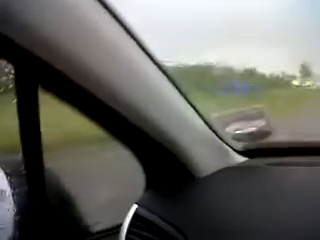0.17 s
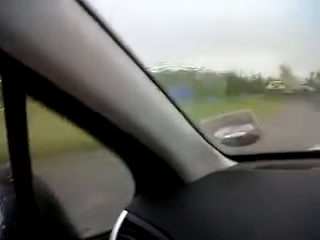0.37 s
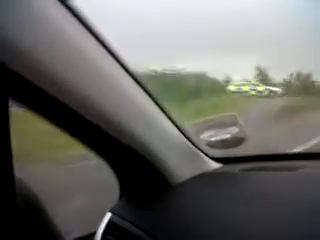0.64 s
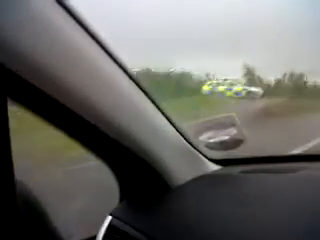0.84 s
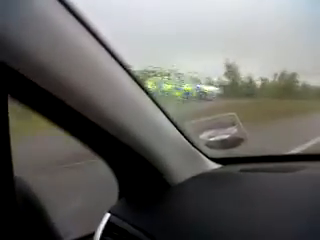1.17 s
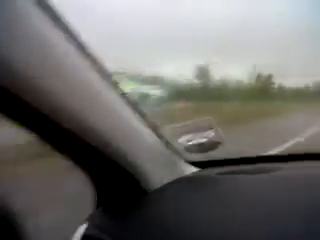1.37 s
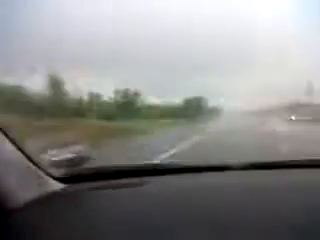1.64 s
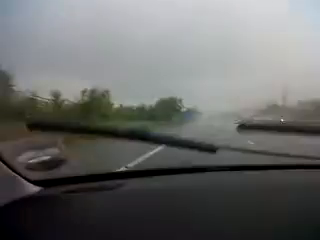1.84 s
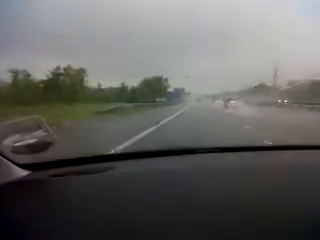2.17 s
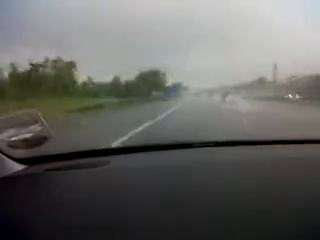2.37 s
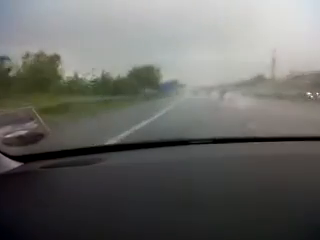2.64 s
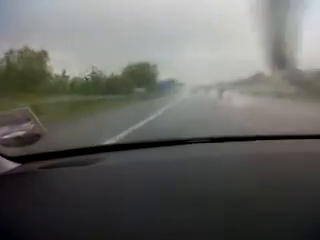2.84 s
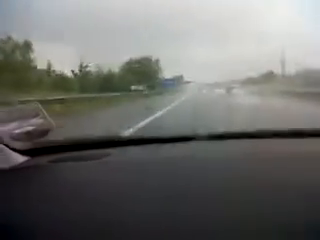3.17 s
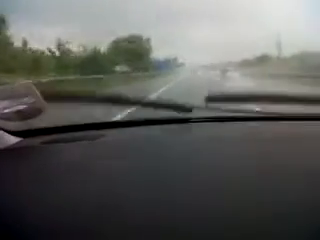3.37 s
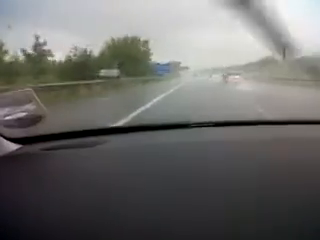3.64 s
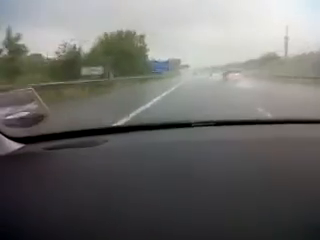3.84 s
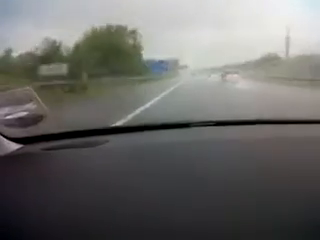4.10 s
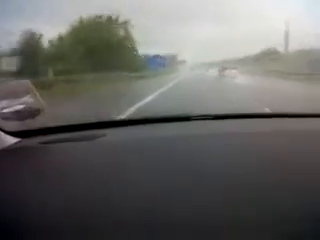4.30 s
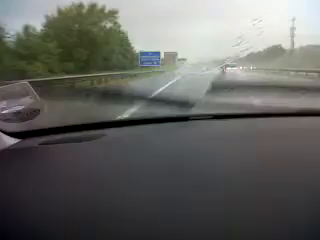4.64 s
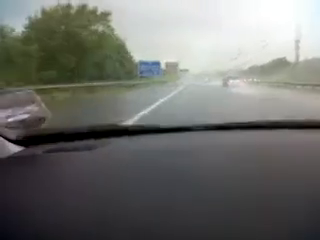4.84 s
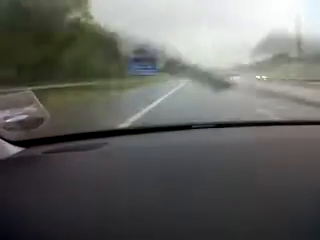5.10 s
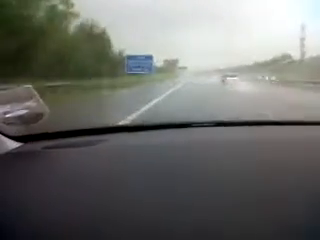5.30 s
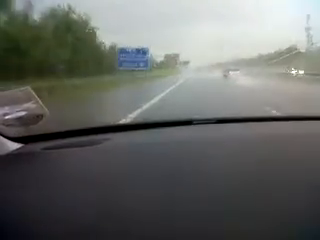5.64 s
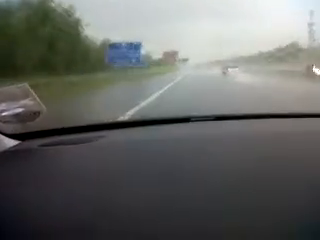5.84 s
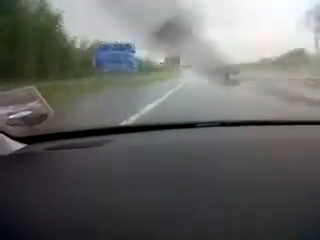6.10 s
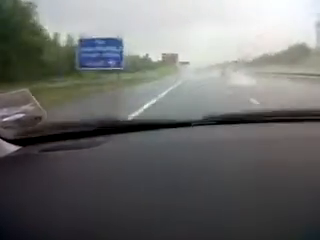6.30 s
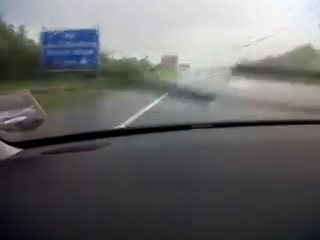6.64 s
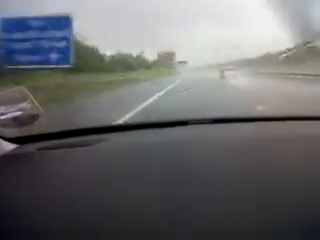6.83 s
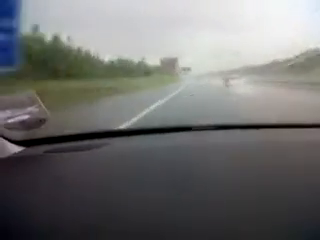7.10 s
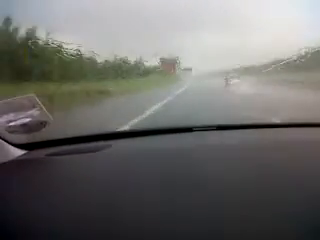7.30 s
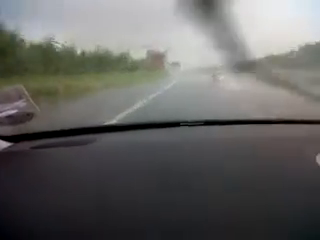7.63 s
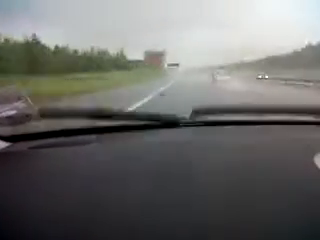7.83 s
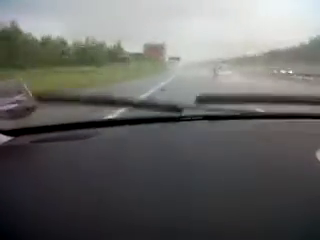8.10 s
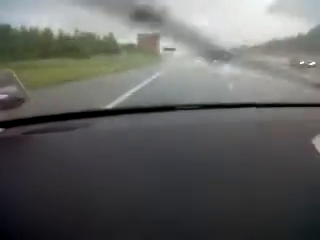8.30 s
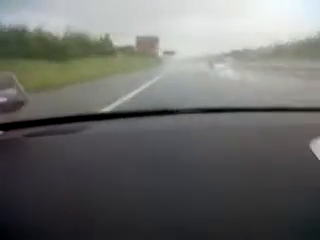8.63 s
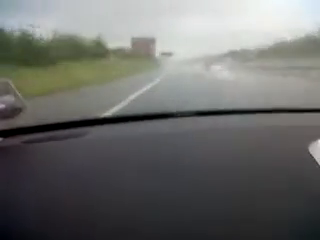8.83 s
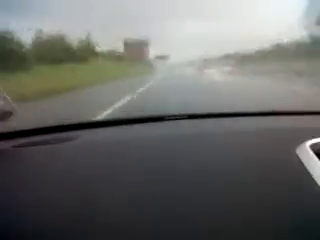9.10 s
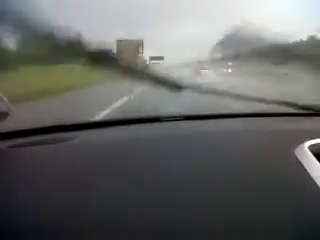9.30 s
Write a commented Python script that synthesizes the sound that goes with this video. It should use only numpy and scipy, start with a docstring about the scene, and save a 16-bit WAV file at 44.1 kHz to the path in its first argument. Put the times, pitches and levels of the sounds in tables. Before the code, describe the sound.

Heavy rain drums on a car's roof and patters brightly on the windscreen, heard from inside on a wet motorway. Tyres roar and wash through standing water over a low cabin boom and faint engine hum. A side window hums at first, then fades. The rain gradually thickens, with occasional fat drops tapping the glass, soft wiper thuds and dull knocks from road seams. One dry tick comes near the end.

```python
"""Heavy rain drums on a car's roof and patters on its windscreen, heard from inside on a wet motorway.
Thousands of impacts a second excite the panels, in clumps, a few drops large; the rain thickens as the
car slowly gathers speed. Beneath it the tyres roar and wash through standing water, the cabin air booms
at bumps, road seams knock, the wipers thud and the engine hums. A side window resonates in the airstream
until the microphone turns away, about a second in. One dry tick sounds near the end."""
import sys
import numpy as np
from scipy import signal
from scipy.fft import rfft, irfft
from scipy.io import wavfile
from scipy.ndimage import uniform_filter1d

SR = 44100
rng = np.random.default_rng(int(sys.argv[2]) if len(sys.argv) > 2 else 0)


def generate_wav(signal):
    """Clip the signal to [-1, 1] and save it as 16-bit WAV at the path in sys.argv[1]."""
    frames = np.transpose(np.atleast_2d(signal))
    scaled = np.clip(frames, -1, 1) * 32767
    pcm = np.round(scaled).astype(np.int16)
    wavfile.write(sys.argv[1], SR, pcm)


N = 417627
T = np.arange(N) / SR

# strength of the rain on roof and glass: time_s, relative_level_db
RAIN_STRENGTH = [(0.0, -43), (0.85, -42.0), (1.6, -44.5), (1.85, -42.3), (2.05, -44), (2.65, -41),
                 (2.9, -43), (3.45, -41.5), (3.65, -42), (4.68, -40.5), (4.8, -40.5), (4.95, -40.5),
                 (5.1, -40.2), (5.25, -42), (5.35, -41.5), (5.52, -41.5), (5.64, -41), (6.05, -39.5),
                 (6.3, -41.5), (6.55, -40), (7.42, -38.5), (7.6, -40), (8.1, -38.5), (8.3, -41.5),
                 (8.5, -37.5), (8.8, -38.5), (9.46, -39.5)]
# spectrum of a drop heard through the lined roof: frequency_hz, relative_level_db
ROOF_SPECTRUM = [(150, -19.5), (400, -5.5), (560, -4.5), (700, 3), (900, 1.5), (1040, -2.5), (1150, 4),
                 (1290, -2), (1460, 0.5), (1750, -8.5), (2050, -11), (2500, -20), (4000, -31),
                 (7000, -61.5)]
# spectrum of a drop heard through the glass: frequency_hz, relative_level_db
GLASS_SPECTRUM = [(300, -14.5), (900, 5.5), (1600, 6), (2100, -4.5), (2480, -7.5), (2750, -0.9),
                  (2980, -1.5), (3180, -3), (3450, -8), (3600, -6), (3850, -7), (4400, -11.5), (4700, -13),
                  (5500, -23), (6500, -33.5), (7000, -35.5), (8000, -53.5)]
# reverberation time of the panels and cabin: frequency_hz, t60_s
CABIN_DECAY = [(200, 0.11), (1000, 0.058), (3000, 0.038), (7000, 0.025)]
# normal modes of the windscreen: pitch_hz, relative_level_db, t60_s
WINDSCREEN_MODES = [(2900, -1, 0.019), (3002, -1, 0.03), (3130, 1, 0.026), (3230, -3, 0.026)]
# tyre roar, following the roughness of the road: time_s, level_db
ROAR_LEVEL = [(0, -36), (1.0, -37), (1.4, -36.5), (3.6, -36.5), (4.7, -35.5), (5.4, -36), (7.3, -35),
              (8.4, -34.5), (9.47, -35)]
# spectrum of road noise in the cabin: frequency_hz, relative_level_db
ROAR_SPECTRUM = [(15, -26), (26, -14), (34, -4), (47, -8), (68, -5), (78, 1.5), (88, -0.5), (110, -5.5),
                 (128, -1), (141, -5.5), (165, -5.5), (220, -6.5), (310, -7.5), (455, -8), (550, -14.5),
                 (1500, -23.5), (3000, -50.5), (7000, -79)]
# resonances of the tread on wet asphalt: pitch_hz, width_hz, relative_level_db
TREAD_RESONANCES = [(775, 85, -1.5), (905, 72, -1)]
# resonances of the side window: pitch_hz, width_hz, relative_level_db
WINDOW_RESONANCES = [(483, 68, 2), (1055, 55, -4.5)]
# bumps in the road that set the cabin air booming: centre_s, relative_level_db
ROAD_BUMPS = [(0.22, -39), (0.53, -34), (1.13, -32.5), (1.37, -37), (1.49, -32), (2.01, -33), (2.18, -32),
              (3.29, -31.5), (3.45, -32.5), (3.56, -31.5), (3.66, -36), (3.97, -31), (4.22, -32.5),
              (4.45, -36), (4.86, -40), (5.07, -31.5), (5.44, -34), (5.68, -31.5), (6.0, -37),
              (6.23, -36.5), (6.82, -34), (7.11, -33), (7.23, -34), (7.44, -37), (7.67, -37), (8.4, -30),
              (8.78, -29), (9.09, -33.5), (9.24, -34), (9.44, -38)]
# drone of the floor panel: time_s, relative_level_db
FLOOR_DRONE = [(0, -43.5), (1.6, -49), (1.83, -52), (2.05, -41), (2.9, -41), (3.05, -51), (3.25, -45),
               (3.6, -45.5), (4.4, -46), (5.2, -46), (5.9, -45), (6.7, -43.5), (8.6, -43), (8.8, -54),
               (9.05, -45), (9.47, -40)]
# course of the engine's hum: time_s, firing_rate_hz, level_db
ENGINE_HUM = [(0, 72.9, -54), (1, 73.64, -46.5), (2.3, 75.1, -49), (3.5, 74.36, -58), (5, 78.04, -44),
              (6.3, 77, -46.5), (8, 77.9, -48.5), (9.47, 78.4, -42.5)]
# large drops on the windscreen: start_s, relative_peak_db
LARGE_DROPS = [(0.3117, -40), (0.348, -38), (0.892, -31), (2.449, -36), (3.1134, -29), (4.585, -31),
               (5.326, -30), (5.6158, -29.5), (5.7783, -41), (6.27, -32), (6.4263, -30), (7.221, -30.5),
               (7.426, -28.5), (7.9554, -33)]
# standing water under the tyres: centre_s, level_db, pitch_hz
STANDING_WATER = [(0.48, -47, 840), (0.8, -41.5, 900), (1.08, -43.5, 470), (1.46, -45, 835),
                  (2.38, -50.5, 1249), (2.74, -44.5, 855), (3.47, -46.5, 1050), (4.35, -45.5, 1334),
                  (4.72, -49, 1200), (4.92, -50, 1400), (6.9, -48.5, 1310), (7.2, -45, 800),
                  (7.45, -45, 779), (7.84, -45, 997), (8.061, -49.5, 1500), (8.46, -40, 900),
                  (8.62, -48, 880), (8.77, -46, 1500)]
# seams in the road: start_s, peak_db
ROAD_SEAMS = [(2.52, -36.5), (6.73, -32), (7.27, -34.5), (7.83, -31.5), (8.55, -36), (9.0, -31.5),
              (9.11, -31)]
# wiper blades flipping at the foot of the windscreen: start_s, peak_db
BLADE_FLIPS = [(3.445, -31.5), (5.045, -33), (6.515, -33), (8.175, -29)]
# a tyre singing through a long streak of water: time_s, pitch_hz, level_db
SWISH_GLIDE = [(6.78, 981, -62), (6.9, 905, -34.5), (6.99, 865, -48.5), (7.05, 800, -39), (7.15, 783, -57)]


def from_db(db):
    """Amplitude grows tenfold for every 20 dB."""
    return 10 ** (np.asarray(db) / 20)


def unit(x):
    """Normalisation to an rms of 1."""
    return x / np.sqrt(np.mean(x ** 2) + 1e-20)


def follow(curve, column=1):
    """Linear interpolation of one column of a curve at every sample."""
    rows = np.array(curve)
    return np.interp(T, rows[:, 0], rows[:, column])


def at_hz(points, hz):
    """Interpolation on a logarithmic frequency axis."""
    frequency_hz, value = np.transpose(points)
    return np.interp(np.log(hz + 1), np.log(frequency_hz), value)


def drift(rate_hz):
    """Low-pass filtered noise: a smooth random fluctuation of rms 1."""
    hz = np.fft.rfftfreq(N, 1 / SR)
    return unit(irfft(rfft(rng.standard_normal(N)) * np.exp(-(hz / rate_hz) ** 2), N))


def band(centre_hz, width_hz):
    """A randomly driven resonance passes a narrow band of noise (complex, rms 1)."""
    hz = np.fft.fftfreq(N, 1 / SR)
    rolloff = (1 + ((hz - centre_hz) / width_hz) ** 2) ** 2
    noise = np.fft.ifft(np.fft.fft(rng.standard_normal(N)) / rolloff)
    return noise / np.std(noise)


def resonances(table):
    """Superposition of noise-driven resonances, at an rms of 1."""
    return unit(sum(from_db(db) * band(hz, width_hz).real for hz, width_hz, db in table))


def impulse_response(spectrum, size=4096):
    """Minimum phase turns a magnitude spectrum into a causal click of energy 1."""
    log_gain = np.log(from_db(at_hz(spectrum, abs(np.fft.fftfreq(size, 1 / SR)))))
    transfer = np.exp(np.conj(signal.hilbert(log_gain)))
    click = np.fft.ifft(transfer).real[:size // 2]
    return click / np.linalg.norm(click)


def reverberate(click, wet_db, size=4096):
    """Diffuse reverberation, different for each spot struck, dies soonest in the treble."""
    hz, t, noise = signal.stft(rng.standard_normal(size), SR, nperseg=128)
    decay = from_db(-60 * t / at_hz(CABIN_DECAY, hz)[:, None])
    tail = signal.istft(noise * decay, SR, nperseg=128)[1]
    tail *= from_db(wet_db) / np.linalg.norm(tail)
    tail[0] += 1  # direct sound
    return signal.fftconvolve(click, tail)


def shower(spectrum, drops_per_s, spread_db, clump_gain, spots=40):
    """Shot noise: drops of many sizes land at random, each exciting one spot of a panel."""
    sizes = from_db(spread_db * np.minimum(rng.exponential(1, N), 4))
    hits = sizes * clump_gain * rng.choice([-1, 1], N) * (rng.random(N) < drops_per_s / SR)
    spot = rng.integers(0, spots, N)
    click = impulse_response(spectrum)
    taps = [reverberate(click, wet_db=-1) for _ in range(spots)]
    return unit(sum(signal.oaconvolve(hits * (spot == k), tap)[:N] for k, tap in enumerate(taps)))


def roof(rain_db, clumps, gain_db=-1.63):
    """Transmission loss through metal and lining dulls the impacts to a dense drumming."""
    drops = shower(ROOF_SPECTRUM, drops_per_s=3800, spread_db=3.0, clump_gain=from_db(0.45 * clumps))
    return from_db(rain_db + gain_db) * drops


def windscreen(rain_db, clumps, growth_db_per_db=1.18):
    """Impacts excite the glass: drops patter brightly and ring it, fine spray merges into hiss."""
    drops = shower(GLASS_SPECTRUM, drops_per_s=2700, spread_db=3.45, clump_gain=from_db(1.35 * clumps))
    spray = unit(signal.oaconvolve(rng.standard_normal(N), impulse_response(GLASS_SPECTRUM))[:N])
    pane = from_db(-47.5) * drops + from_db(-61) * spray + from_db(-60 + 0.6 * clumps) * glass_ring()
    return from_db(growth_db_per_db * (rain_db - rain_db.mean())) * pane


def glass_ring(drops_per_s=600, spread_db=4.0, rise_s=0.00035):
    """Modal ringing: each heavier drop excites one damped mode of the pane."""
    sizes = from_db(spread_db * np.minimum(rng.exponential(1, N), 3))
    hits = sizes * (rng.random(N) < drops_per_s / SR)
    mode = rng.integers(0, len(WINDSCREEN_MODES), N)
    t = np.arange(SR // 20) / SR
    attack = 1 - np.exp(-t / rise_s)
    rings = [from_db(db - 60 * t / t60_s) * attack * np.sin(2 * np.pi * hz * t)
             for hz, db, t60_s in WINDSCREEN_MODES]
    return unit(sum(signal.oaconvolve(hits * (mode == k), ring)[:N] for k, ring in enumerate(rings)))


def tyres(tread_db=-46.5, growth_db_per_s=0.04, uneven_db=1.9):
    """The body filters broadband road noise; the tread's hollow resonance grows with speed."""
    body_filter = from_db(at_hz(ROAR_SPECTRUM, np.fft.rfftfreq(N, 1 / SR)))
    roar = unit(irfft(rfft(rng.standard_normal(N)) * body_filter, N))
    tread = resonances(TREAD_RESONANCES)
    tread_gain = from_db(tread_db + growth_db_per_s * T + uneven_db * drift(2.4))
    return from_db(follow(ROAR_LEVEL)) * roar + tread_gain * tread


def side_window(level_db=-45, turn_at_s=1.17, fade_s=0.31):
    """Airflow drives the window's resonances; the hum fades as the microphone turns to the road."""
    facing = (1 - np.tanh((T - turn_at_s) / fade_s)) / 2
    return from_db(level_db) * facing * resonances(WINDOW_RESONANCES)


def throb(centre_hz, width_hz):
    """Amplitude limiting holds a resonance nearly even in strength while its pitch wanders."""
    noise = band(centre_hz, width_hz)
    return unit(noise.real / np.sqrt(abs(noise) ** 2 + 0.072))


def cabin_boom(air_db=-42.0, bump_gain_db=-0.9, floor_gain_db=-0.2):
    """Forced vibration: the road shakes the cabin air, most at bumps; a floor panel drones above it."""
    rolling = from_db(air_db + 2.5 * drift(13.0))
    bumps = from_db(bump_gain_db) * swells(ROAD_BUMPS, half_width_s=0.047)
    air = np.hypot(rolling, bumps) * throb(centre_hz=110.0, width_hz=9.7)  # the powers add
    floor_gain = from_db(follow(FLOOR_DRONE) + floor_gain_db + 1.3 * drift(17))
    return air + floor_gain * throb(centre_hz=171.2, width_hz=32)


def swells(events, half_width_s):
    """A Gaussian envelope rises and falls around each event."""
    return sum(from_db(db) * np.exp(-((T - centre_s) / half_width_s) ** 2) for centre_s, db in events)


def engine(waver_hz=0.53, octave_db=-5):
    """Periodic firing gives a fundamental and its octave, both wavering a little."""
    firing_hz = follow(ENGINE_HUM) + waver_hz * drift(3.7)
    phase = 2 * np.pi * np.cumsum(firing_hz) / SR
    octave = from_db(octave_db + 2.6 * drift(7.3)) * np.sin(2 * phase)
    level_db = follow(ENGINE_HUM, column=2) + 0.91 * drift(4)
    return from_db(level_db) * unit(np.sin(phase) + octave)


def large_drops(gain_db=-0.5, cutoff_hz=3600):
    """A soft impact carries little treble: single fat drops tap the glass just above the patter."""
    softening = signal.butter(3, cutoff_hz, fs=SR, output="sos")
    click = signal.sosfilt(softening, impulse_response(GLASS_SPECTRUM))
    out = np.zeros(N)
    for start_s, peak_db in LARGE_DROPS:
        tap = reverberate(click, wet_db=1)
        part = out[round(start_s * SR):][:len(tap)]
        part += from_db(peak_db + gain_db) * tap[:len(part)] / abs(tap).max()
    return out


def puddles(width_hz=270):
    """Water washing through the wheel arches makes band noise, each patch at its own hollow pitch."""
    return sum(swells([(centre_s, db)], half_width_s=0.11) * unit(band(hz, width_hz).real)
               for centre_s, db, hz in STANDING_WATER)


def thuds(events, ring_hz, rise_s, t60_s):
    """A damped oscillator: each soft blow sets one low resonance ringing briefly."""
    out, t = np.zeros(N), np.arange(SR // 2) / SR
    attack = 1 - np.exp(-(t / rise_s) ** 2)
    ring = attack * from_db(-60 * t / t60_s) * np.sin(2 * np.pi * ring_hz * t)
    for start_s, peak_db in events:
        part = out[round(start_s * SR):][:len(t)]
        part += from_db(peak_db) * ring[:len(part)] / abs(ring).max()
    return out


def seam_knocks():
    """Impulse excitation: seams in the road knock the floor panel into free vibration."""
    return thuds(ROAD_SEAMS, ring_hz=178.3, rise_s=0.022, t60_s=0.19)


def wipers():
    """Structure-borne sound: each flip of the blades thuds softly through the bulkhead."""
    return thuds(BLADE_FLIPS, ring_hz=162.0, rise_s=0.018, t60_s=0.3)


def tyre_swish(width_hz=70):
    """A tyre sings in a streak of water: narrow-band noise on a carrier of falling frequency."""
    carrier = np.exp(2j * np.pi * np.cumsum(follow(SWISH_GLIDE)) / SR)
    in_water = (T > SWISH_GLIDE[0][0]) & (T < SWISH_GLIDE[-1][0])
    singing = unit((band(0, width_hz) * carrier).real)
    return in_water * from_db(follow(SWISH_GLIDE, column=2)) * singing


def tick(start_s=9.3299, step_db=-32, fall_s=0.00051):
    """An abrupt step has a broad spectrum, heard as one thin, dry tick."""
    since_s = T - start_s
    return from_db(step_db) * (since_s >= 0) * np.exp(-abs(since_s) / fall_s)


def scene(gust_db=0.65, gust_hz=24, clump_hz=53):
    """The sources superpose; the same gusts and clumps modulate the rain on roof and windscreen."""
    clumps = drift(clump_hz)
    clumps = unit(clumps - uniform_filter1d(clumps, size=SR // 8))  # each lasts tens of milliseconds
    rain_db = follow(RAIN_STRENGTH) + gust_db * drift(gust_hz)
    rain = roof(rain_db, clumps) + windscreen(rain_db, clumps) + large_drops()
    road = tyres() + puddles() + tyre_swish()
    car = side_window() + cabin_boom() + seam_knocks() + wipers() + engine()
    return (rain + road + car)[None]


def record(dry, microphone_hz=7400, cutoff_hz=16000):
    """Band limiting: a small microphone loses the high treble; only the tick reaches above its band."""
    microphone = signal.firwin(511, microphone_hz, window=("kaiser", 9), fs=SR)
    low_pass = signal.firwin(511, cutoff_hz, window=("kaiser", 9), fs=SR)
    heard = signal.oaconvolve(dry, microphone[None], "same") + tick()
    return signal.oaconvolve(heard, low_pass[None], "same")


dry = scene()
out = record(dry)
generate_wav(out)
```